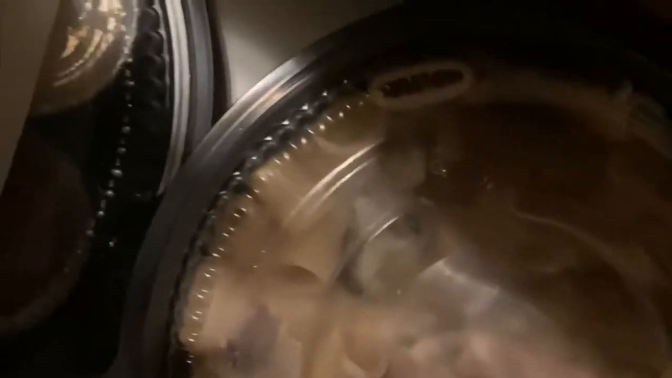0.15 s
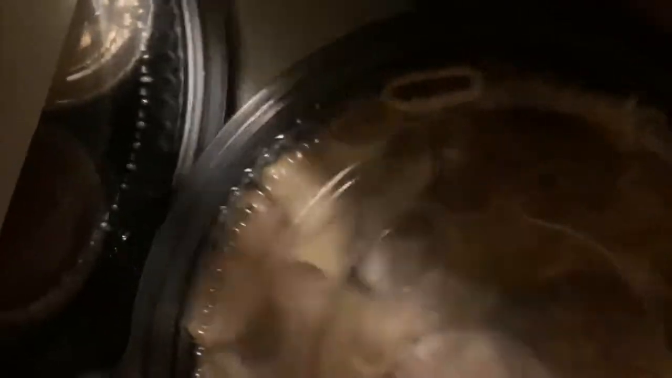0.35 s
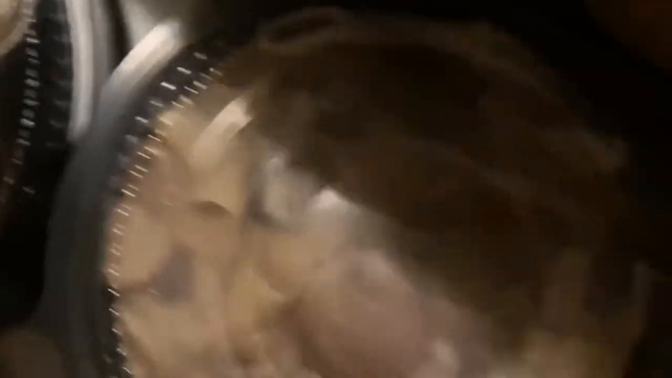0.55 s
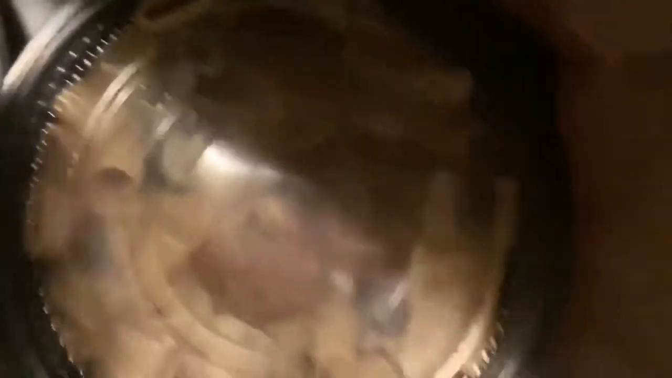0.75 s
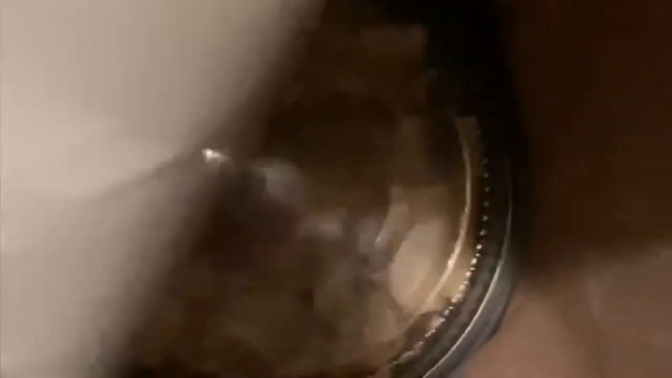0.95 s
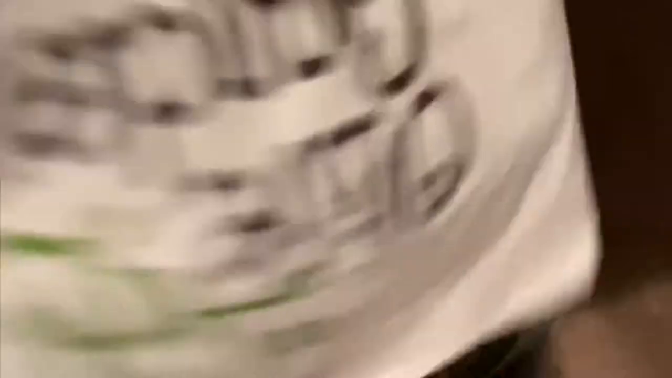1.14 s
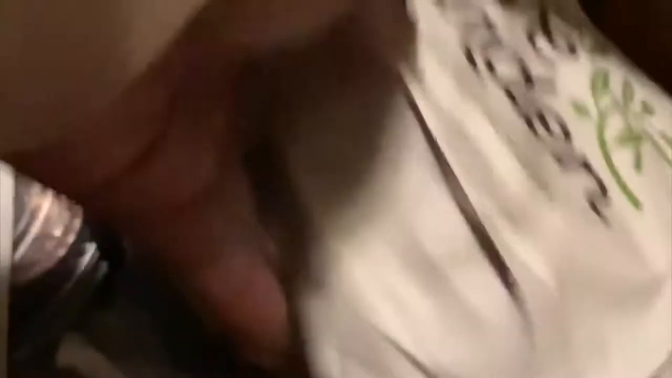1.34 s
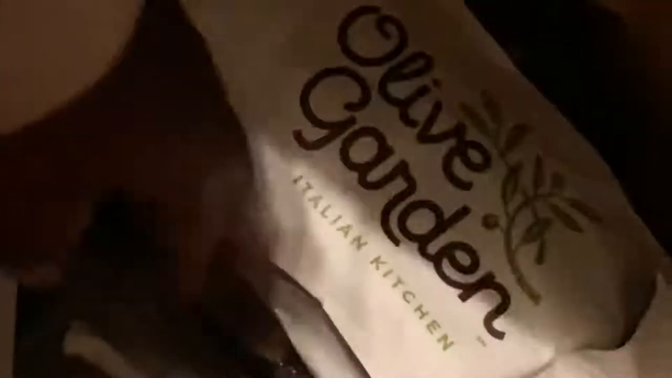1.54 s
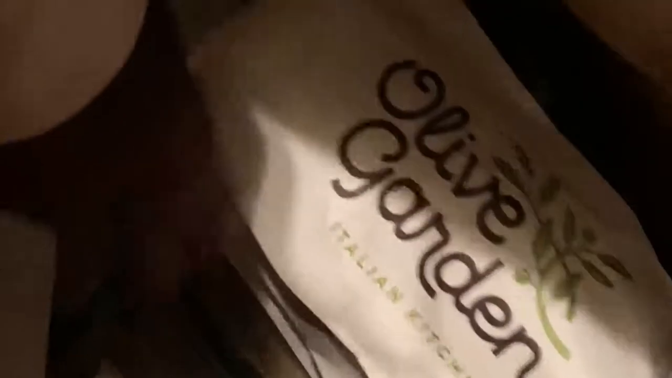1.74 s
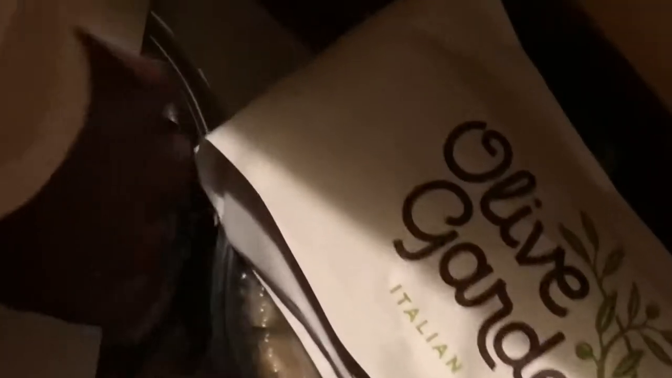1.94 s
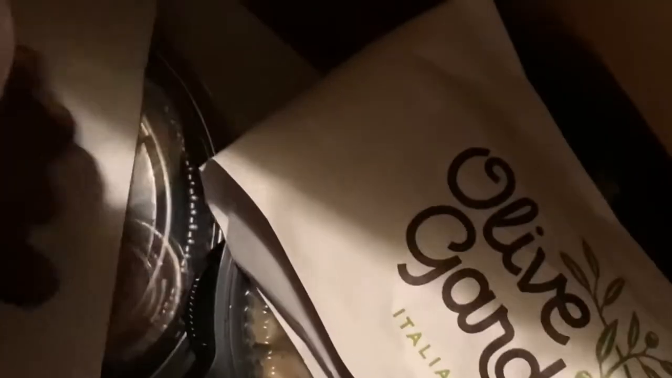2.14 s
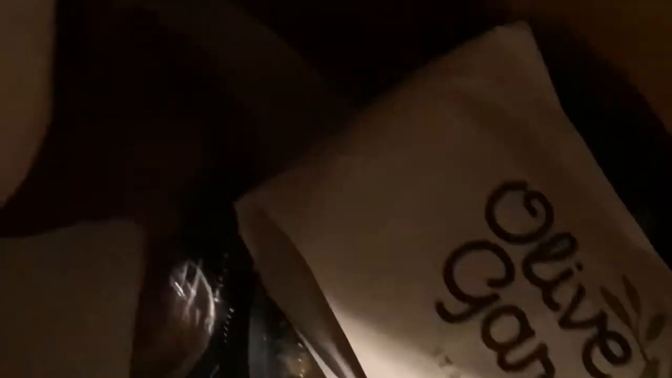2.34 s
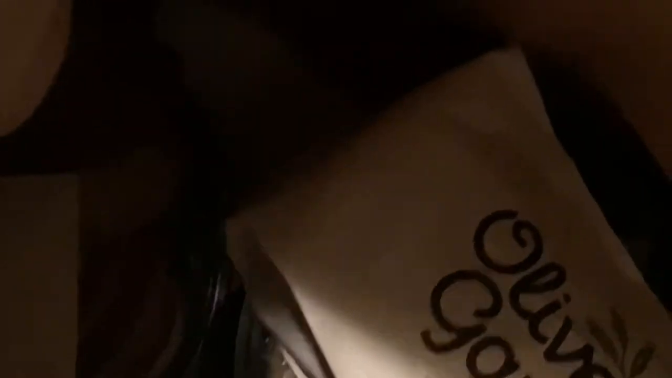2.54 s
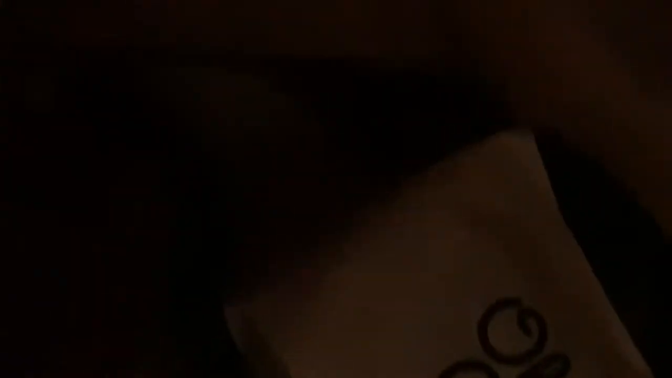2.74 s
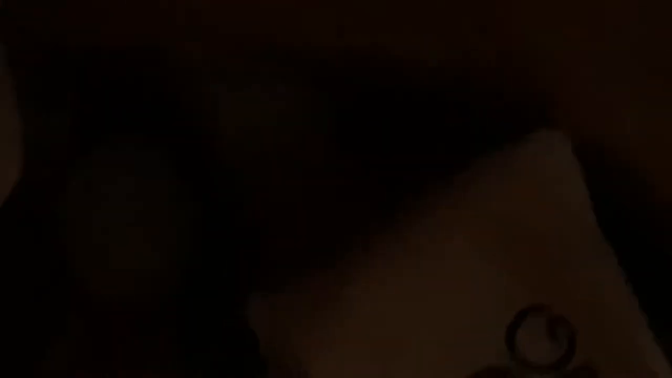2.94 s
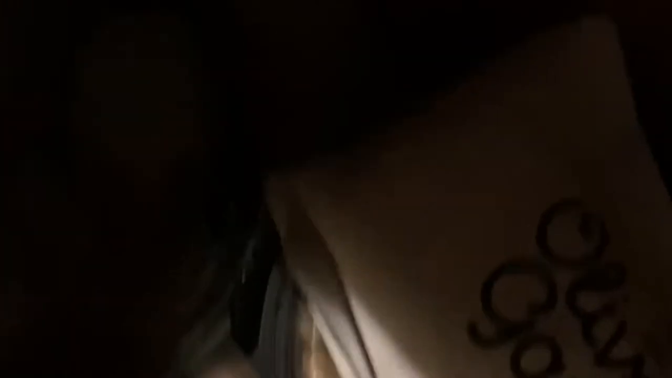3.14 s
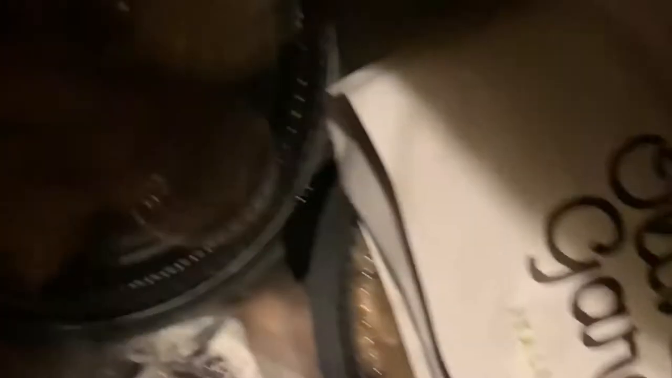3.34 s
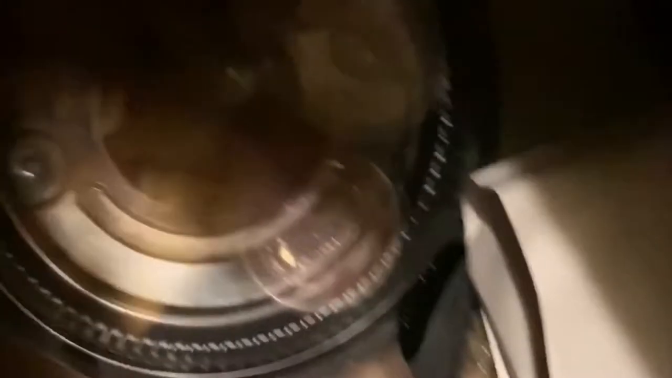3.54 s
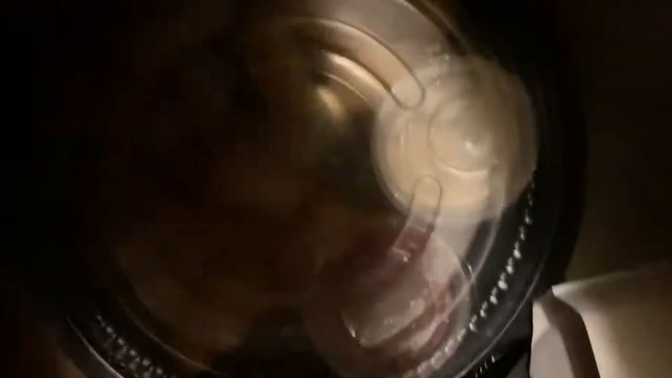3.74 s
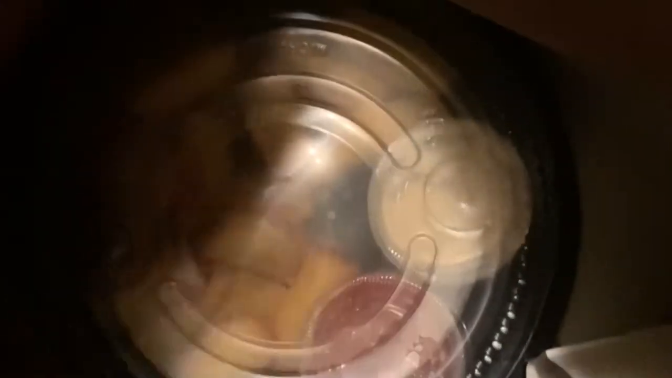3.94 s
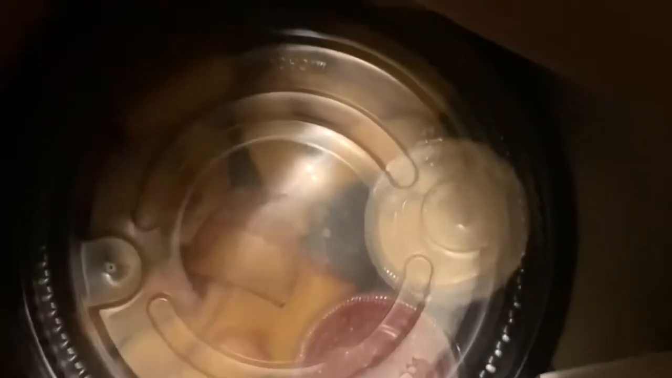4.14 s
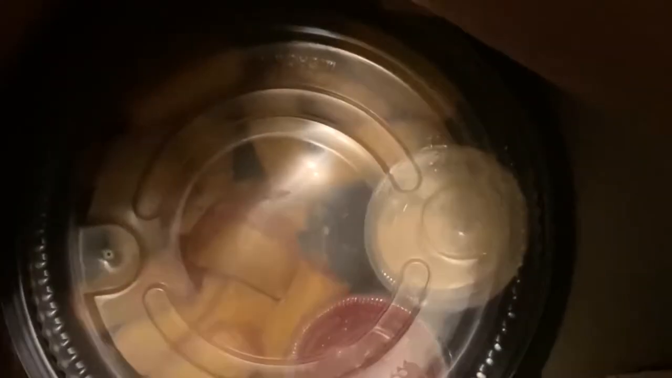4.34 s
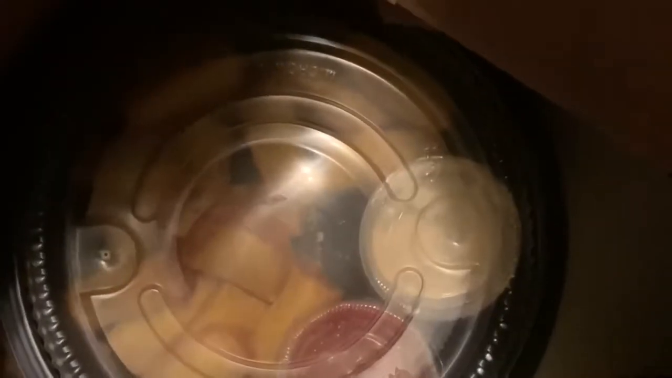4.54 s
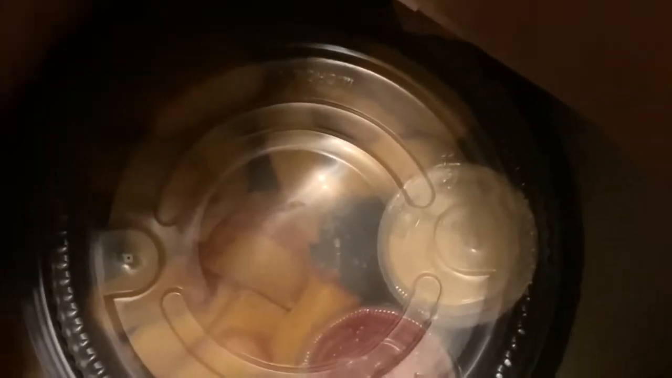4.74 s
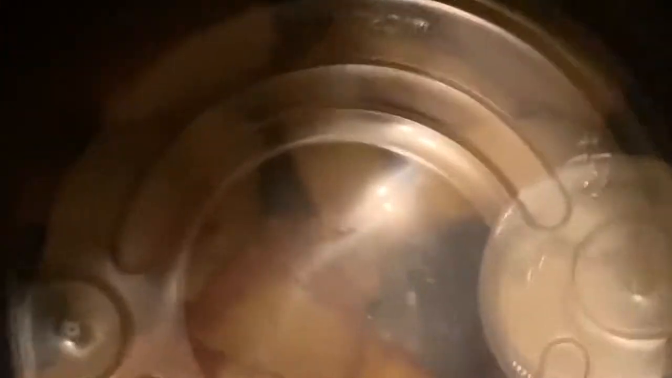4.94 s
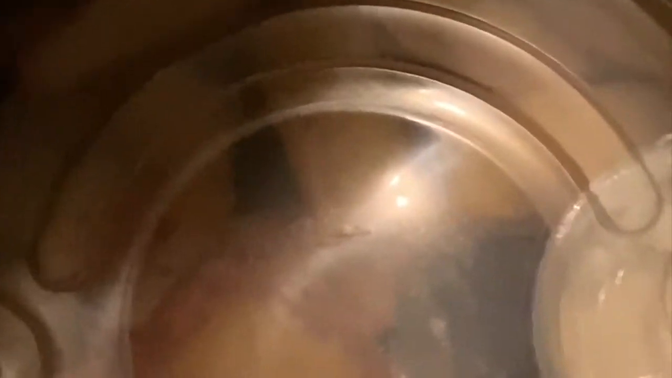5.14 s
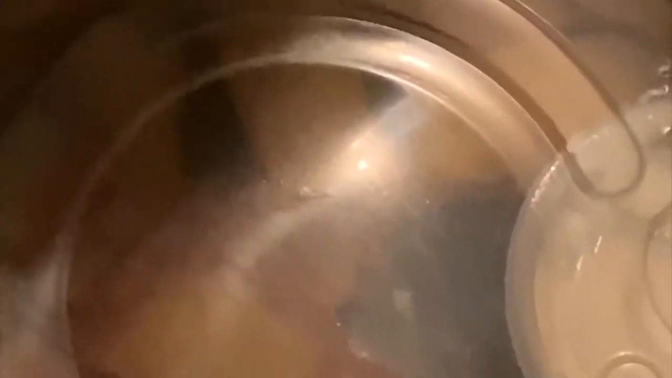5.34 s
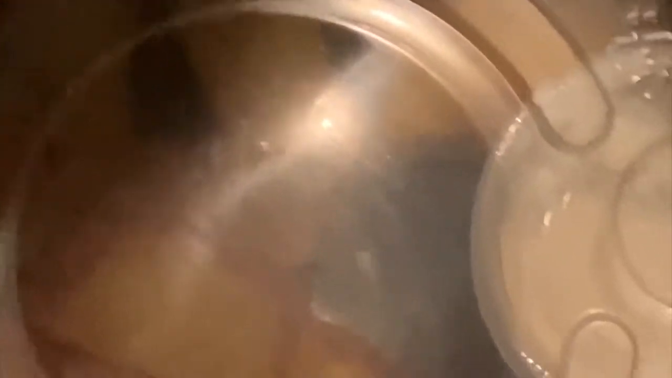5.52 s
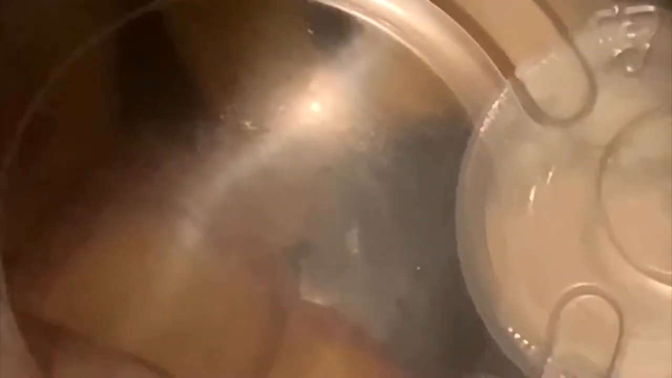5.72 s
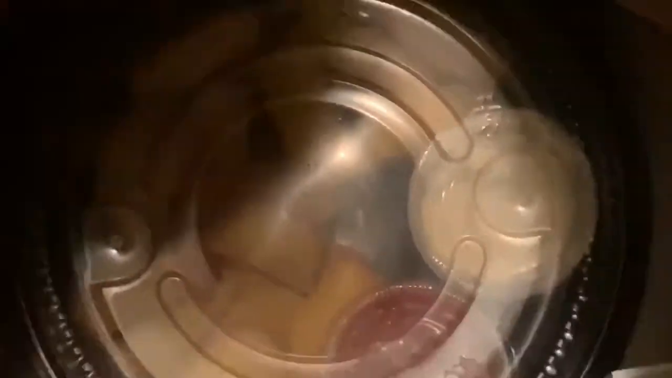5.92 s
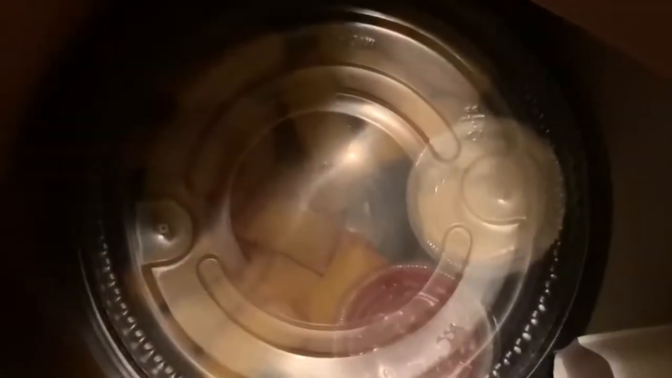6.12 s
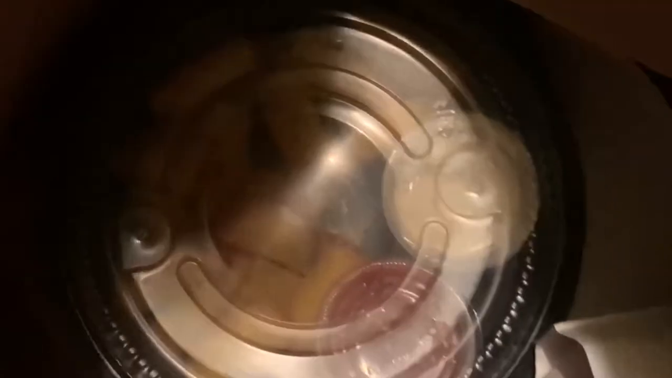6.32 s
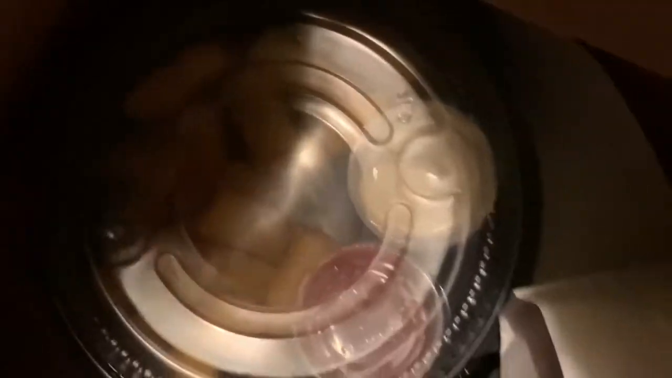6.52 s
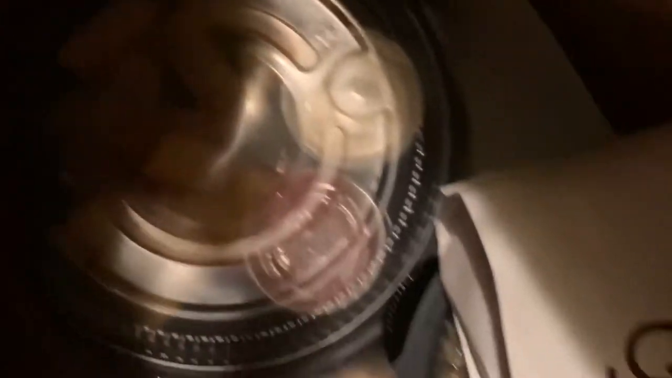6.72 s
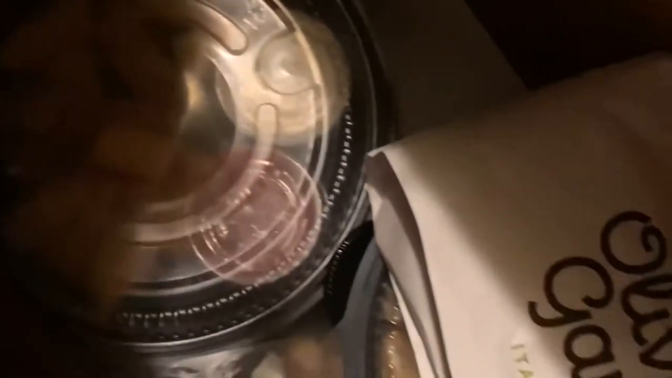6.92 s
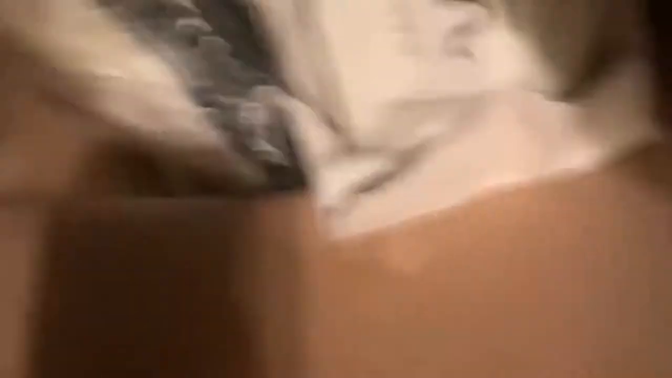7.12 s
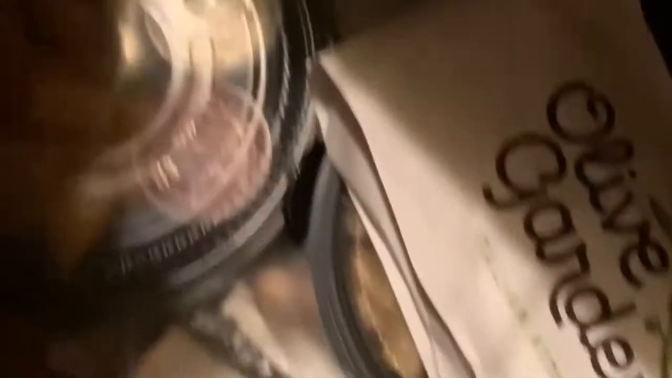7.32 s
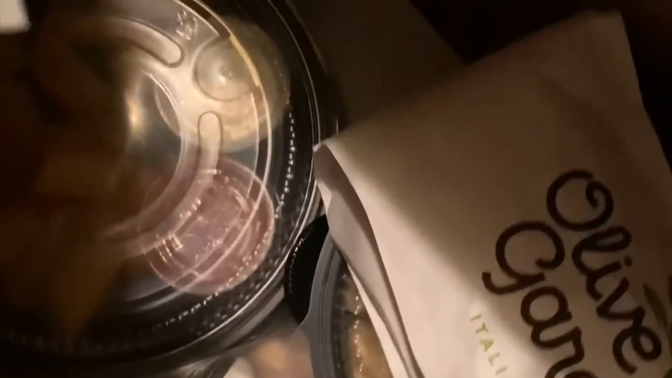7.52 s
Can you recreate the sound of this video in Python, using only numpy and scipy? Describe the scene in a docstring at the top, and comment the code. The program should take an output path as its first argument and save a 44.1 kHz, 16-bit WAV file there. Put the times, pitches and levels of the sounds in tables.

```python
"""Paper bag and plastic containers

A paper bag is dragged off takeout containers; one is lifted, held still and set down in a small room.
Paper is filtered noise and brief panel rings, creases and lid are decaying resonant cracks, and the tray
knocks are tones falling in pitch. Ventilation is filtered noise and a drifting tone. Soft puffs of air
and one bump on the case join them, heard by two hand-held microphone ports close by."""
import sys
import numpy as np
from scipy import signal
from scipy.fft import rfft, irfft, next_fast_len
from scipy.io import wavfile
from scipy.ndimage import uniform_filter1d, map_coordinates

SR = 44100
rng = np.random.default_rng(int(sys.argv[2]) if len(sys.argv) > 2 else 0)


def persist_wave(psi):
    """Save psi, clipped to +-1, as 16-bit WAV."""
    counts = np.round(np.clip(psi, -1, 1) * 32767).astype(np.int16)
    wavfile.write(sys.argv[1], SR, np.atleast_2d(counts).T)


N = 338247

# Spectral weights of tray bumping, tray flexing, paper crumpling, paper sliding and air rush:
# frequency_hz, relative_level_db
BUMP_SPECTRUM = [(25, -9.5), (60, 9), (120, 5.5), (220, 3), (390, -2.5), (600, -1.5), (1000, 1),
                 (2000, -73)]
HOLLOW_SPECTRUM = [(130, -10), (220, -1.5), (430, -5), (620, -22), (1500, -50)]
CRUMPLE_SPECTRUM = [(200, -36), (500, 7), (900, 3.5), (1600, 6.5), (2400, -2.5), (3500, 4), (5500, -2.5),
                    (9000, -12)]
SLIDE_SPECTRUM = [(1200, -9.5), (2500, 1.5), (4000, 2), (6000, 5.5), (10000, 4.5), (13000, 3), (14000, 0.5),
                  (16000, -2)]
AIR_SPECTRUM = [(20, -11.5), (50, -8), (80, -11), (130, 0), (250, -8.5), (450, -10.5), (650, -16),
                (900, -13.5), (1500, -15), (2200, -19), (3500, -32.5), (4800, -37.5), (9000, -58),
                (16000, -55.5)]
# Wavering tones of the ventilation: centre_hz, level_db, half_width_hz
HUM_TONES = [(78.8, -44, 7.7), (413.3, -56.5, 10), (2137, -56, 8.6)]
# Right port against left, for things at hand and for the room:
# frequency_hz, right_lag_rad (negative: ahead), likeness (0-1)
NEAR_PORTS = [(40, 0, .98), (120, -.35, .98), (300, -.95, .96), (450, -1.7, .92), (650, -3, .82),
              (1100, -4.9, .66), (1500, -6.2, .55), (2150, -5.6, .35), (2600, -4.5, .62), (3600, -4.8, .97),
              (4600, -4.8, .998)]
FAR_PORTS = [(60, 0, .95), (300, -1, .93), (650, -3.1, .9), (2300, -3.2, .75), (2800, -4.7, .88),
             (4600, -4.8, .97)]
# Steady contact as the bag is moved and the container lifted, then set down:
# time_s, rubbing_db, bumping_db (before BUMP_TRIM_DB)
MOVE_BAG_CONTACT = [(0, -59, -38.5), (.18, -68, -37), (.225, -57, -25.5), (.28, -78, -37.5),
                    (.44, -67, -36), (.475, -44.5, -38.5), (.8, -38.5, -32), (1, -31.5, -33.5),
                    (1.03, -58.5, -39), (1.3, -46.5, -37), (1.55, -41, -25), (1.6, -38.5, -35.5),
                    (1.7, -51.5, -35), (2.12, -58, -37)]
LIFT_CONTACT = [(2.12, -53, -36), (2.3, -45, -36), (2.73, -49.5, -35), (2.78, -32.5, -29),
                (2.9, -40.5, -40.5), (3, -34, -34), (3.24, -39, -33.5), (3.45, -36.5, -42),
                (3.66, -36, -48.5), (3.7, -37, -34.5), (3.84, -34.5, -27), (3.92, -43, -42),
                (4.06, -39, -54.5), (4.11, -53.5, -39), (4.35, -53.5, -53), (4.79, -63, -52),
                (4.9, -80.5, -52)]
SET_DOWN_CONTACT = [(6.17, -87, -47), (6.24, -56, -57), (6.3, -56, -46), (6.412, -39.5, -42),
                    (6.53, -52.5, -41), (6.6, -47.5, -56), (6.706, -51.5, -52), (6.735, -40, -46),
                    (6.86, -46.5, -36), (7.02, -39, -49), (7.115, -34.5, -56), (7.14, -49.5, -38),
                    (7.19, -59, -45), (7.66, -74, -40)]
# Paper slides over plastic: start_s, length_s, hiss_db (before SLIDE_TRIM_DB), crumpling_db, swell_db
PAPER_STROKES = [(0.028, 0.061, -51.5, -43, -10.5), (0.557, 0.14, -37.5, -39.5, -3.5),
                 (0.819, 0.12, -32, -32, 2), (0.96, 0.033, -26.5, -38, 8.5),
                 (1.112, 0.22, -46.5, -43.5, -9.5), (1.306, 0.042, -28, -28, 3.5),
                 (1.342, 0.15, -23, -23, 3), (1.508, 0.028, -36, -27, -2), (1.634, 0.018, -28, -43, -10),
                 (1.94, 0.043, -41, -41, -1), (2.136, 0.12, -30.5, -40.5, -16.5),
                 (2.238, 0.047, -36, -32.5, 12.5), (2.339, 0.14, -33, -40, 5.5),
                 (2.569, 0.076, -37.5, -43, 16), (2.953, 0.026, -23.5, -23.5, -19),
                 (3.042, 0.087, -22.5, -31, -3), (3.289, 0.066, -28, -46.5, -10),
                 (3.395, 0.0282, -28.5, -37.5, 9.5), (3.507, 0.078, -35.5, -33, -7.5),
                 (3.992, 0.041, -33, -37, 2), (6.211, 0.064, -46, -47, 9), (6.308, 0.064, -32, -32.5, 4.5),
                 (6.895, 0.13, -33, -70, 14), (7.296, 0.12, -50, -51.5, -5.5)]
# Flat paper slides smoothly, creased paper crackles: time_s, crispness (0-1)
CRISPNESS = [(.9, 0.17), (1.4, 0.3), (2.8, 0.88), (3.7, 0.8), (4.1, 0.45), (6.9, 0.28)]
# Fingers grip the tray and its hollow walls flex: time_s, level_db
GRIP_LEVELS = [(1.8, -42), (2.3, -35.5), (2.4, -34.5), (2.82, -37.5), (3.5, -48)]
# A wall of the bag flaps with a dull pop: start_s, level_db (over 10 ms), centre_hz
BAG_POPS = [(.197, -33, 557), (.2977, -38, 815), (.7791, -31.5, 1880), (.8215, -26.5, 1000),
            (.8926, -34, 1560), (1.1776, -29.5, 900), (1.242, -36.5, 1860), (1.2615, -32, 1660),
            (1.3184, -26, 1360), (1.37, -22, 1010), (1.433, -22.5, 1510), (1.449, -18, 1100),
            (1.459, -19, 1290), (1.507, -14.5, 1100), (1.5145, -29, 1560), (1.569, -29, 2000),
            (1.696, -25.5, 840), (1.776, -34, 1100), (1.936, -35.5, 1480), (1.9523, -29.5, 1350),
            (2.1052, -30, 1330), (2.235, -38, 1100), (2.2933, -21.5, 1150), (2.3244, -26.5, 676),
            (2.4694, -27.5, 1430), (2.5583, -27.5, 930), (2.692, -33, 1120), (2.7405, -27.5, 1320),
            (2.7871, -27, 1000), (2.9546, -32, 1420), (3.053, -23.5, 1400), (3.143, -27, 1270),
            (3.1802, -25, 1130), (3.7573, -23, 730), (3.775, -28.5, 1100), (7.1174, -37, 770)]
# Creases crack brightly; near 4.3-4.7 s the lid gives broad, duller ticks:
# start_s, level_db (over 10 ms), centre_hz
BROAD_CRACKS = [(.3995, -46, 8950), (1.4725, -23, 3500), (1.5072, -23.5, 2510), (1.5325, -22, 4310),
                (1.668, -34, 3500), (1.8386, -36, 9300), (2.146, -29, 6550), (2.269, -23.5, 7580),
                (2.3707, -27.5, 5530), (2.5715, -24, 8900), (2.6427, -17.5, 7150), (2.7642, -17.5, 7000),
                (2.8143, -22, 5620), (2.87, -17.5, 6060), (2.885, -18, 5960), (2.904, -21, 4600),
                (2.9357, -19, 7800), (2.9435, -23, 5140), (3.0585, -18, 7060), (3.0712, -19, 8190),
                (3.1145, -17.5, 5920), (3.1514, -18, 7000), (3.2077, -20.5, 8200), (3.259, -26.5, 6010),
                (3.2767, -22, 7040), (3.3043, -35.5, 6540), (3.33, -27, 5500), (3.387, -27, 6930),
                (3.4175, -31, 6720), (3.589, -25.5, 7580), (3.7742, -23, 3480), (3.8092, -26.5, 2290),
                (3.8135, -20.5, 3000), (3.8601, -28.5, 2340), (4.0133, -24.5, 4160), (4.3331, -34, 2740),
                (4.5778, -41, 2860), (4.6228, -36.5, 2830), (4.695, -30, 3420), (6.321, -28.5, 4200),
                (6.368, -32.5, 3500), (7.053, -22, 9050)]
# The thin lid ticks with a clear pitch: start_s, level_db (over 10 ms), centre_hz
LID_TICK_EVENTS = [(.728, -25, 2700), (.891, -23.5, 3100), (1.1285, -24, 2900), (3.142, -26, 3000),
                   (3.729, -29, 2110), (4.1423, -32.5, 1680), (6.354, -24.5, 2900), (6.994, -23.5, 2970),
                   (7.0066, -26, 2880), (7.0495, -25, 1520)]
# The rim catches on the lid below as the container is set down: start_s, level_db (over 10 ms)
RIM_CATCHES = [(6.6228, -26), (6.7312, -22), (6.7505, -19.3), (6.7715, -25.5), (6.7918, -30), (6.809, -28)]
# The tray flexes or lands: start_s, blow_db (before KNOCK_TRIM_DB), final_pitch_hz, initial_excess_hz
TRAY_KNOCKS = [(0.199, -18.5, 117, 193), (1.181, -22, 230, 174), (1.469, -9.5, 266, 98),
               (1.516, -13.5, 104, 260), (2.149, -17.5, 221, 150), (2.273, -16, 212, 24),
               (2.281, -12.5, 384, 16), (2.342, -15, 304, 110), (2.562, -20, 167, 46),
               (2.622, -18, 320, 19), (2.646, -6.5, 307, 114), (2.7442, -5, 236.7, 212),
               (2.789, -20, 115, 130), (3.2, -19.5, 162, 130), (4.153, -24.5, 173, 60)]
# The bag pushes air over the ports: centre_s, level_db, spread_s
AIR_PUFFS = [(0.804, -30.5, 0.045), (1.368, -32.5, 0.028), (1.49, -25.5, 0.055)]

AIR_DB = -41
MOTOR_HZ, MOTOR_DB, MOTOR_DRIFT_HZ, MOTOR_WAVER_DB = 186.9, -45.5, 0.77, 0.5
# resonances shift as a sheet bends, and the air wavers: depth_db, width_hz, life_s
CRUMPLE_PATCHES, SLIDE_PATCHES, AIR_PATCHES = (3.5, 150, .03), (3.8, 240, .025), (2.2, 45, .25)

ATTACK_S, RELEASE_S = .014, .009
SLIPS_PER_S, SLIP_DECAY_S, SLIP_DB = 150, .003, 3.6
# crumpling level at a rubbing of GENTLE_DB, and dB gained per dB of rubbing
GENTLE_DB, CRUMPLE_DB, CRUMPLE_GROWTH = -40, -38, 0.79
# only a hard stroke shakes the tray: bumping level at a gentle crumple, and dB gained per dB
SHAKE_DB, SHAKE_GROWTH = -47, 1.73
BUMP_TRIM_DB, SLIDE_TRIM_DB, KNOCK_TRIM_DB = -4, 2.5, 2
# dry paper rings very briefly; PITCHED is the strength of each panel's own tone
CRUMPLE_RING_S, SLIDE_RING_S, PITCHED, PANEL_WIDTH_OCTAVES = .003, .0018, .35, .6

# half widths of resonances in octaves, and level of the bright edge against the resonance
BROAD_WIDTH, TICK_WIDTH, POP_WIDTH = 1.3, 0.42, 0.62
BROAD_EDGE_DB, TICK_EDGE_DB, RIM_EDGE_DB, POP_EDGE_DB = -10, -20, -6, -22
# ring_s, added ring in cycles of the centre pitch, tail_db, tail_s
BROAD_FADE, TICK_FADE = (.0011, 1.5, -17, .007), (.0008, 2.5, -20, .012)
POP_FADE, RIM_FADE = (.0015, 2.2, -14, .011), (.0006, 1, -24, .007)
RIM_HZ = 3400
# no two buckles are alike: ring spread is in natural log
RING_SPREAD, MODE_DB, MODE_SPACING_HZ = .2, 4, 400
TABLE_DELAY_S, TABLE_DB = .0023, -9
SNAP_LIKENESS = .92  # cracks come from all over the sheet, so the ports hear them less alike (0-1)
RATTLE_SHARE, RATTLE_HZ = .7, 220
JOLT_S = 7.0515
PORT_DELAY_S, PORT_ONSET_HZ = .000235, 3600
BAND_EDGE_HZ = 15800


def amp(db):
    """Decibel law: twenty decibels are a tenfold amplitude."""
    return 10 ** (np.asarray(db) / 20)


def evened(x):
    """Normalization: the signal is brought to unit rms."""
    return x / np.sqrt(np.mean(x ** 2) + 1e-20)


def read(points, hz, axis=1):
    """Interpolation: a table column is joined by straight lines over log frequency."""
    points = np.array(points, float)
    return np.interp(np.log(hz + 1), np.log(points[:, 0] + 1), points[:, axis])


def add(mix, s, sound):
    """Superposition: a sound is summed into the mix from time s."""
    part = mix[:, max(round(s * SR), 0):][:, :sound.shape[1]]
    part += sound[:, :part.shape[1]]


def colour(x, gain):
    """Linear filtering: the spectrum is multiplied by gain(hz)."""
    size = next_fast_len(N + 4096)
    spectrum = rfft(x, size) * gain(np.fft.rfftfreq(size, 1 / SR))
    return irfft(spectrum, size)[..., :N]


def causal(gain):
    """Minimum phase: the response with this gain rings only after its blow."""
    log_gain = np.log(np.maximum(gain, 1e-5))
    circle = np.r_[log_gain, log_gain[-2:0:-1]]
    return np.exp(np.conj(signal.hilbert(circle)))[:len(gain)]


def together(a_db, b_db):
    """Incoherent addition: the powers of two unrelated sounds add."""
    return 10 * np.log10(amp(a_db) ** 2 + amp(b_db) ** 2)


def wander(rate_hz):
    """Random modulation: random knots joined by straight lines, at unit rms."""
    knots = rng.standard_normal(2048)
    return evened(np.interp(np.arange(N) / SR * rate_hz, np.arange(len(knots)), knots))


def patchy(x, depth_db, width_hz, life_s, size=1024):
    """Shifting resonance: random regions of the time-frequency plane rise and fall."""
    overlap = size * 3 // 4
    hz, t, z = signal.stft(x, SR, nperseg=size, noverlap=overlap)
    knots = rng.standard_normal((int(hz[-1] / width_hz) + 2, int(t[-1] / life_s) + 2))
    grid = np.meshgrid(hz / width_hz, t / life_s, indexing="ij")
    field = map_coordinates(knots, grid, order=1)
    shaped = z * amp(depth_db * evened(field))
    return signal.istft(shaped, SR, nperseg=size, noverlap=overlap)[1][:, :N]


def ventilation():
    """Flow noise and narrow-band noise: a dull rush of air with a few wavering tones."""
    rush = patchy(rng.standard_normal((2, N)), *AIR_PATCHES, size=4096)
    out = amp(AIR_DB) * evened(colour(rush, lambda hz: amp(read(AIR_SPECTRUM, hz))))
    for tone_hz, db, width_hz in HUM_TONES:
        noise = rng.standard_normal((2, N))
        tone = colour(noise, lambda hz: 1 / (1 + ((hz - tone_hz) / width_hz) ** 2))
        out += amp(db) * evened(tone)
    return out


def motor():
    """Periodic vibration: the ventilation's motor hums, drifting a little in pitch and level."""
    turns = np.cumsum(MOTOR_HZ + MOTOR_DRIFT_HZ * wander(3.4)) / SR
    swing = np.sqrt(2) * amp(MOTOR_DB + MOTOR_WAVER_DB * wander(7.9))
    return swing * np.array([np.sin(2 * np.pi * turns), np.cos(2 * np.pi * turns)])


def contact():
    """Sustained friction: levels of rubbing and bumping in dB, silent outside the movements."""
    t = np.arange(N) / SR
    levels = np.full((2, N), -140.)
    for curve in (MOVE_BAG_CONTACT, LIFT_CONTACT, SET_DOWN_CONTACT):
        s, *columns = np.transpose(curve)
        levels = np.maximum(levels, [np.interp(t, s, c, -np.inf, -np.inf) for c in columns])
    return levels


def strokes():
    """Transient friction: power of hiss and crumpling as strokes take hold, swell or ease, and let go."""
    power = np.zeros((2, N))
    for s, length, hiss_db, crumple_db, swell_db in PAPER_STROKES:
        t = np.arange(0, length + 8 * RELEASE_S, 1 / SR)
        shape = np.minimum(t / ATTACK_S, 1) * amp(swell_db * (np.minimum(t / length, 1) - .5))
        shape *= np.exp(-np.maximum(t - length, 0) / RELEASE_S)
        add(power, s, (amp([[hiss_db], [crumple_db]]) * shape) ** 2)
    return power


def slips():
    """Stick-slip: the sheet catches and lets go at random, each slip sudden then dying; mean 0, rms 1."""
    kicks = (rng.random(N) < SLIPS_PER_S / SR) * rng.uniform(.5, 1, N)
    surge = np.sqrt(signal.lfilter([1], [1, -np.exp(-1 / (SLIP_DECAY_S * SR))], kicks))
    return evened(surge - surge.mean())


def grains(spectrum, level_db, crisp, slip_db, per_s, spread_db, ring_s, pitched, low_hz, high_hz,
           patches=None, count=60):
    """Impulsive friction: tiny slips each ring a small panel at its own pitch, over a smooth rub."""
    t, bins_hz = np.arange(1024) / SR, np.fft.rfftfreq(1024, 1 / SR)
    panel_hz = np.geomspace(low_hz, high_hz, count)[:, None, None]
    tone = np.sin(2 * np.pi * (panel_hz * t + rng.random((count, 2, 1)))) * np.exp(-t / (2 * ring_s))
    octaves_off = np.log2((bins_hz + 1) / panel_hz)
    noise = rng.standard_normal((count, 2, len(t)))
    buzz = irfft(rfft(noise) / np.hypot(1, octaves_off / PANEL_WIDTH_OCTAVES))
    panels = buzz * np.exp(-t / ring_s) + pitched * buzz.std(2, keepdims=True) * tone

    chance = rng.random(N)
    size = np.minimum(rng.exponential(1, N), 4)
    panel = rng.integers(0, count, N)
    ticks = np.zeros((2, N + len(t)))
    for i in np.flatnonzero(chance < per_s / SR):
        ticks[:, i:i + len(t)] += amp(spread_db * size[i]) * panels[panel[i]]

    def weight(hz):
        return amp(read(spectrum, hz))

    ticks = evened(colour(ticks[:, :N], weight))
    rub = evened(colour(rng.standard_normal((2, N)), weight))
    crisp = np.clip(crisp, 0, 1)
    out = (crisp * ticks + (1 - crisp) * rub) * amp(crisp * slip_db)
    if patches:
        out = patchy(out, *patches)
    # the hand, not chance, sets the strength of each stroke
    strength = np.sqrt(np.abs(uniform_filter1d((out ** 2).mean(0), size=1800)) + 1e-12)
    return out / strength * amp(level_db)


def rustle():
    """Coupled friction: tray bumps and flexes, sheet crumples and slides; the paper shares its slips."""
    rub_db, tray_db = contact()
    hiss_db, crush_db = 10 * np.log10(strokes() + 1e-20)
    slide_db = together(rub_db, hiss_db)
    crumple_db = together(CRUMPLE_DB + CRUMPLE_GROWTH * (rub_db - GENTLE_DB), crush_db)
    bump_db = together(tray_db, SHAKE_DB + SHAKE_GROWTH * (crush_db - GENTLE_DB))
    t = np.arange(N) / SR
    crisp = np.interp(t, *np.transpose(CRISPNESS))
    grip_db = np.interp(t, *np.transpose(GRIP_LEVELS), -np.inf, -np.inf)
    slip_db = SLIP_DB * slips()
    bump = grains(BUMP_SPECTRUM, bump_db, 0.69, 0, per_s=170, spread_db=3.5,
                  ring_s=0.003, pitched=0.51, low_hz=66, high_hz=610)
    flex = grains(HOLLOW_SPECTRUM, grip_db, 0.63, 0, per_s=90, spread_db=6.5,
                  ring_s=0.0039, pitched=PITCHED, low_hz=200, high_hz=460)
    crumple = grains(CRUMPLE_SPECTRUM, crumple_db, np.sqrt(crisp), slip_db, per_s=600, spread_db=2.0,
                     ring_s=CRUMPLE_RING_S, pitched=PITCHED, low_hz=498, high_hz=4964,
                     patches=CRUMPLE_PATCHES)
    slide = grains(SLIDE_SPECTRUM, slide_db, crisp, slip_db, per_s=1300, spread_db=-2.0,
                   ring_s=SLIDE_RING_S, pitched=PITCHED, low_hz=2230, high_hz=15500,
                   patches=SLIDE_PATCHES)
    return amp(BUMP_TRIM_DB) * bump + flex + crumple + amp(SLIDE_TRIM_DB) * slide


def snaps(events, width, edge_db, ring_s, cycles, tail_db, tail_s, rise_cycles=0.5, size=4096):
    """Snap buckling: a crack round its own pitch, thrown back by the table; lower panels ring longer."""
    out, t, hz = np.zeros((2, N)), np.arange(size) / SR, np.fft.rfftfreq(size, 1 / SR)
    for s, db, centre_hz in events:
        ring = (ring_s + cycles / centre_hz) * np.exp(RING_SPREAD * rng.standard_normal())
        mode_knots = rng.standard_normal(64)
        modes = amp(MODE_DB * np.interp(hz / MODE_SPACING_HZ, np.arange(64), mode_knots))
        echo = amp(TABLE_DB) * (t > TABLE_DELAY_S) * np.exp(-np.abs(t - TABLE_DELAY_S) / TABLE_DELAY_S)
        fade = np.hypot(np.exp(-t / ring) + amp(tail_db) * np.exp(-t / tail_s), echo)
        fade *= 1 - np.exp(-t * centre_hz / rise_cycles)  # wide panels take a moment to swing
        hump = 1 / (1 + (np.log2((hz + 1) / centre_hz) / width) ** 2)
        hump *= hz ** 2 / np.hypot(hz ** 2, 500 ** 2)  # weak below 500 Hz
        edge = amp(edge_db) * hz ** 2 / (hz ** 2 + centre_hz ** 2) / np.hypot(1, hz / centre_hz / np.pi)
        burst = rng.standard_normal((2, size)) * fade
        crack = irfft(rfft(burst) * causal(np.hypot(hump, edge) * modes))
        crack /= np.sqrt((crack ** 2).sum(1, keepdims=True) / (SR / 100))  # unit rms over 10 ms
        add(out, s, amp(db) * crack)
    return out


def buckles():
    """Sudden release of bending energy: bag pops, crease cracks, broad and pitched lid ticks, rim clicks."""
    rim = [(s, db, RIM_HZ) for s, db in RIM_CATCHES]
    pops = snaps(BAG_POPS, POP_WIDTH, POP_EDGE_DB, *POP_FADE)
    broad = snaps(BROAD_CRACKS, BROAD_WIDTH, BROAD_EDGE_DB, *BROAD_FADE)
    pitched_ticks = snaps(LID_TICK_EVENTS, TICK_WIDTH, TICK_EDGE_DB, *TICK_FADE)
    return pops + broad + pitched_ticks + snaps(rim, TICK_WIDTH, RIM_EDGE_DB, *RIM_FADE)


def knocks(sag_s=.009, rise_s=0.00082, cycles=1.64, body=.2, body_s=0.022):
    """Bending-wave dispersion: high notes arrive first, so knocks fall in pitch; contents rattle."""
    out, t = np.zeros((2, N)), np.arange(4096) / SR
    for s, db, end_hz, sag_hz in TRAY_KNOCKS:
        turns = np.cumsum(end_hz + sag_hz * np.exp(-(t / sag_s) ** 2)) / SR
        fade = (1 - body) * np.exp(-turns / cycles) + body * np.exp(-t / body_s)
        swing = amp(db + KNOCK_TRIM_DB) * (1 - np.exp(-t / rise_s)) * fade
        knots = rng.standard_normal((64, 2)) @ [1, 1j]
        jitter = np.interp(t * RATTLE_HZ, np.arange(len(knots)), knots)
        rattle = RATTLE_SHARE * np.minimum(t / sag_s, 1) * jitter
        wave = swing * (1 + rattle) * np.exp(2j * np.pi * turns)
        add(out, s, np.array([wave.imag, wave.real]))
    return out


def wafts(centre_hz=62, width_octaves=0.7):
    """Low-frequency flow noise: soft puffs of air flutter deeply at the ports."""
    t = np.arange(N) / SR
    noise = rng.standard_normal((2, N))
    flutter = colour(noise, lambda hz: 1 / (1 + (np.log2((hz + 1) / centre_hz) / width_octaves) ** 4))
    flutter = evened(flutter)
    flutter /= np.sqrt(uniform_filter1d(flutter ** 2, size=2600))
    return flutter * sum(amp(db) * np.exp(-((t - s) / spread) ** 2) for s, db, spread in AIR_PUFFS)


def jolt(level_db=-10, tick_db=-30, fall_s=0.00413, fade_s=0.009, drop_hz=900, end_hz=52, opposed_hz=190):
    """Structure-borne impact: a bump on the ports' case gives a tick and a thud that plunges in pitch."""
    t = np.arange(4096) / SR
    turns = np.cumsum(end_hz + drop_hz * np.exp(-t / fall_s)) / SR
    thud = amp(level_db) * np.exp(-t / fade_s) * np.sin(2 * np.pi * turns)
    tick = amp(tick_db) * np.exp(-t / 0.0011) * rng.standard_normal(len(t))
    case = np.zeros((1, N))
    add(case, JOLT_S, (thud + tick)[None])
    # the ports move together in the bass and against each other above it
    right = colour(case[0], lambda hz: 1.8 / (1 + (hz / opposed_hz) ** 4) - .8)
    return np.array([case[0], right])


def room(x, wet_db=-15, t60=0.086, dull_hz=5000):
    """Reverberation: decaying noise makes the short, soft tail of a furnished room."""
    t = np.arange(SR // 3) / SR
    tail = rng.standard_normal((2, len(t))) * amp(-60 * t / t60) * (t > .004)
    wet = signal.oaconvolve(x, tail / np.linalg.norm(tail[0]), axes=1)[:, :N]
    return x + amp(wet_db) * colour(wet, lambda hz: 1 / np.hypot(1, hz / dull_hz))


def ports(x, pair, likeness=1, scatter=0.026):
    """Interchannel coherence: the right port hears the left's sound phase-shifted, with unrelated sound."""
    def lag(hz):
        return read(pair, hz) + 2 * np.pi * PORT_DELAY_S * np.maximum(hz - PORT_ONSET_HZ, 0)

    def same(hz):
        loss = scatter * np.sin(lag(hz)) ** 4 * (hz > PORT_ONSET_HZ)
        return np.clip(likeness * read(pair, hz, axis=2) - loss, 0, 1)

    direct = colour(x[0], lambda hz: same(hz) * np.exp(-1j * lag(hz)))
    stray = colour(x[1], lambda hz: np.sqrt(1 - same(hz) ** 2) * np.exp(-1j * lag(hz)))
    return np.array([x[0], direct + stray])


def scene():
    """Superposition: handling close by, ventilation all round; the level dips briefly after the bump."""
    handling = ports(room(rustle() + knocks()) + wafts(), NEAR_PORTS)
    cracks = ports(room(buckles()), NEAR_PORTS, SNAP_LIKENESS)
    background = ports(ventilation() + motor(), FAR_PORTS)
    t = np.arange(N) / SR
    dip_db = -14 * np.exp(-((t - JOLT_S - .034) / .029) ** 8)
    return (handling + cracks + background) * amp(dip_db) + jolt()


def record(dry):
    """Port response: the right is a little fuller in the low middle; then both are band limited."""
    # frequency_hz, gain_db
    right_db = [(120, 0), (400, 2.3), (750, 1.5), (1400, -1), (2100, 0), (2600, 1.5), (3600, -.3), (5000, 0)]
    heard = np.array([dry[0], colour(dry[1], lambda hz: amp(read(right_db, hz)))])
    low_pass = signal.firwin(511, BAND_EDGE_HZ, window=("kaiser", 9), fs=SR)
    return signal.oaconvolve(heard, low_pass[None], "same")


dry = scene()
out = record(dry)
persist_wave(out)
```